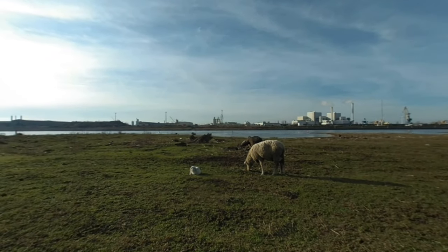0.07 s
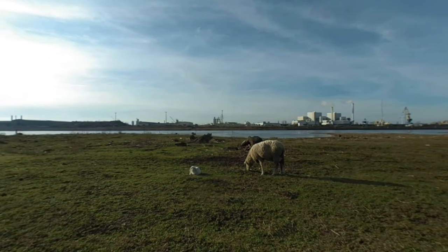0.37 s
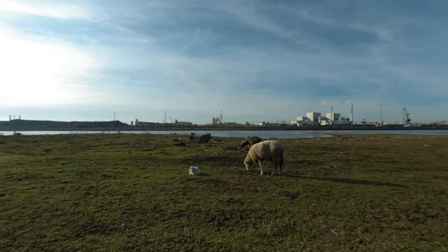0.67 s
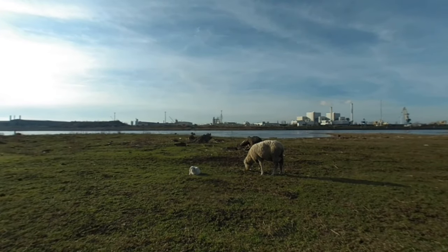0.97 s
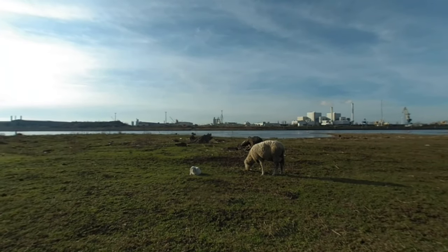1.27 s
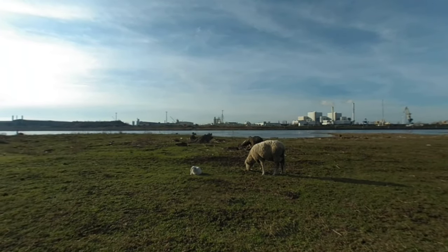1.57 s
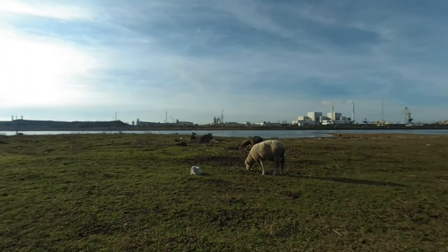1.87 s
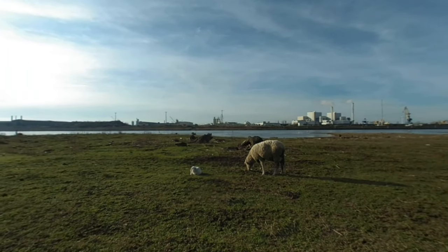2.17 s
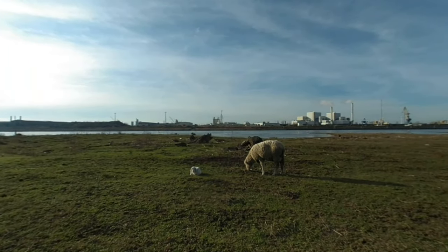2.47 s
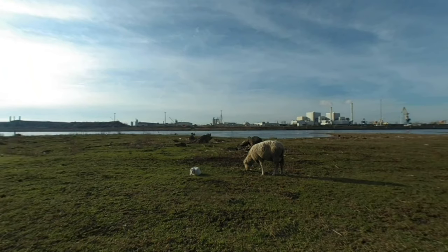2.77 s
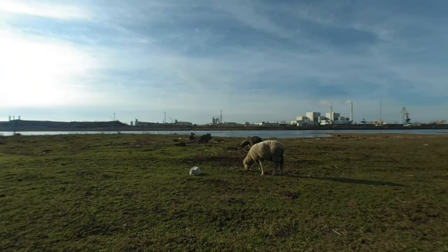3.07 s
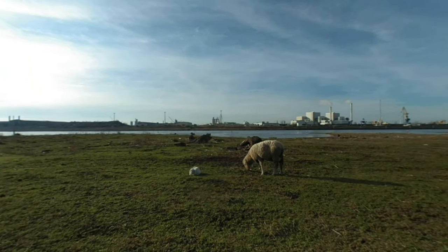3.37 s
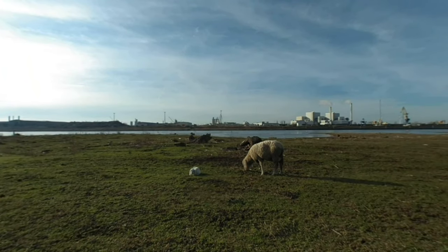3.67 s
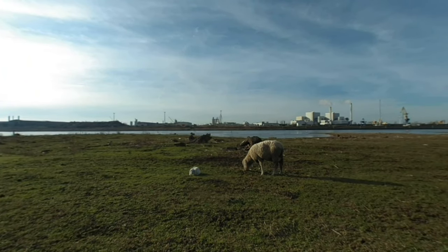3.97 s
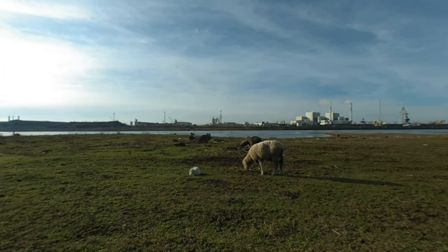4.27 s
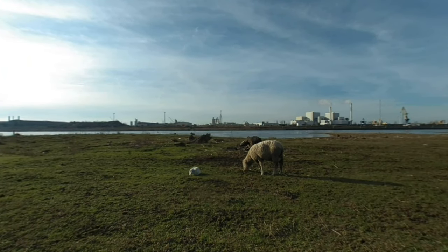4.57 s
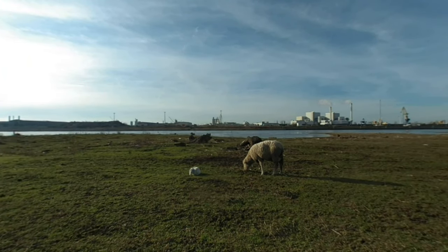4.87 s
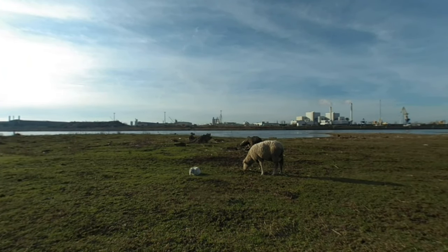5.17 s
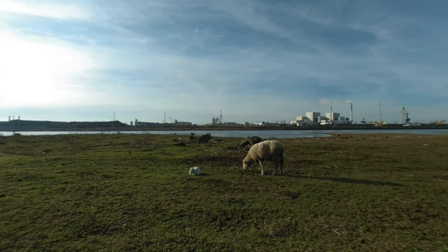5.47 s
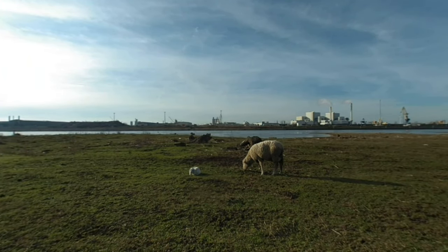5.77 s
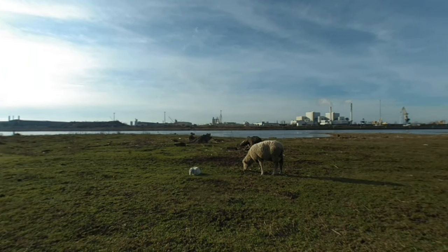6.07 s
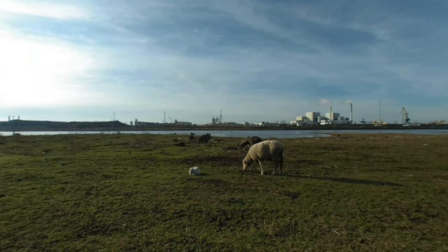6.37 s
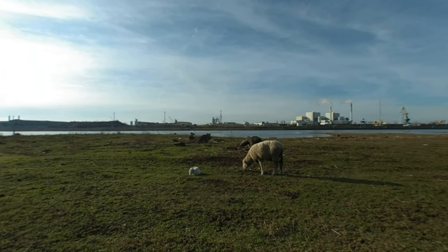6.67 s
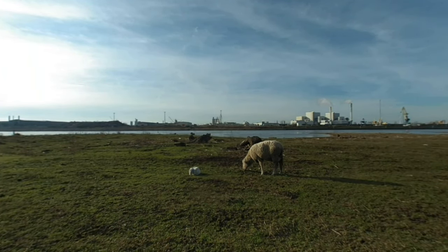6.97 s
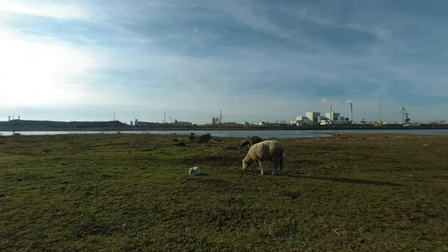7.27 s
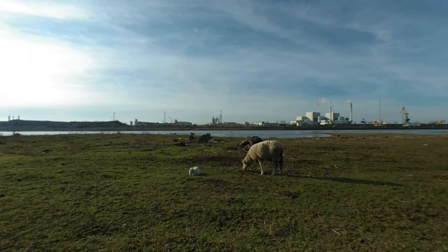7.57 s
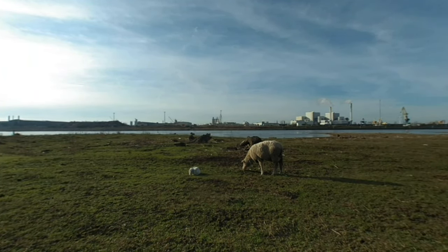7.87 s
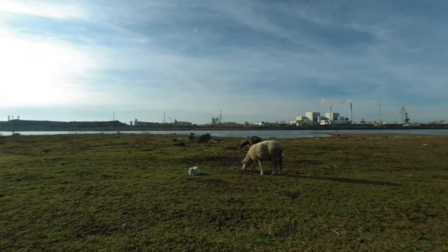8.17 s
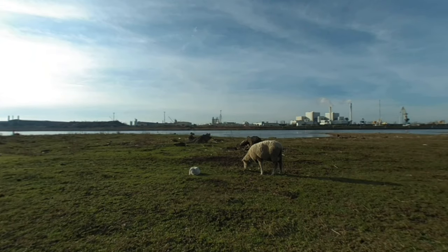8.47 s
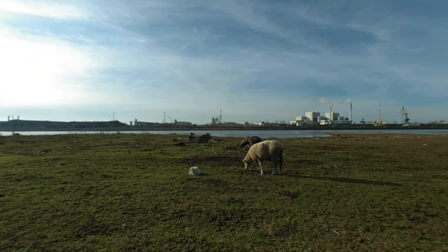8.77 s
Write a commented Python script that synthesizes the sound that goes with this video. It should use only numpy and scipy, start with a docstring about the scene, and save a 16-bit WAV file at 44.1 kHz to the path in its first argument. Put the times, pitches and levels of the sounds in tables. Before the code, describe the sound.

A sheep snorts once and then bleats with a trembling voice in an open field beside water. Wind hits the microphone in low, uneven thumps from side to side, louder than the animal, before easing back to a rumble. A weaker snort follows, along with tiny grass rustles and snaps. Distant machinery drones throughout with brief soft moaning tones, and a barely audible second sheep calls at the end.

```python
"""On a quiet grassy riverbank a sheep snorts, then gives one quavering bleat.
The snorts are air noise ringing the nose; the bleat is vocal-fold pulses filtered by mouth and throat.
Wind rumbles and buffets the two microphone ports over the drone of works across the water.
Far machinery moans now and then, dry grass rustles and snaps, the sheep snorts again,
and a distant sheep answers faintly."""
import sys
import numpy as np
from scipy import signal
from scipy.fft import rfft, irfft, next_fast_len
from scipy.io import wavfile
from scipy.ndimage import uniform_filter1d

SR = 44100
rng = np.random.default_rng(int(sys.argv[2]) if len(sys.argv) > 2 else 0)


def output_pcm(signal):
    """Save a mono or channel-first signal as 16-bit PCM at the path in sys.argv[1].

    Samples are clipped to [-1, 1] before scaling.
    """
    pcm = np.clip(np.atleast_2d(signal).T, -1, 1) * 32767
    wavfile.write(sys.argv[1], SR, np.round(pcm).astype(np.int16))


N = 388521
TIME = np.arange(N) / SR
CUTOFF_HZ = 15700


def amp(db):
    """Decibels to amplitude ratio."""
    return 10 ** (np.asarray(db) / 20)


def unit(x):
    """Normalisation to rms 1."""
    return x / np.sqrt(np.mean(x ** 2) + 1e-20)


def glide(rows, t):
    """Linear interpolation of each column of a table at the times t."""
    s, *columns = np.transpose(rows)
    return [np.interp(t, s, c) for c in columns]


def add(mix, s, sound):
    """Superposition of a sound on the mix, starting at time s."""
    part = mix[..., max(round(s * SR), 0):][..., :sound.shape[-1]]
    part += sound[..., :part.shape[-1]]


def noise(colour, size=N):
    """Gaussian noise of rms 1, shaped by a spectrum of (frequency [Hz], level [dB])."""
    hz, db = np.transpose(colour)
    span = next_fast_len(max(size, 4096))
    gain = amp(np.interp(np.log(np.fft.rfftfreq(span, 1 / SR) + 1), np.log(hz), db))
    return unit(irfft(rfft(rng.standard_normal(span)) * gain, span)[:size])


def wander(rate_hz, size=N):
    """Random modulation: low-pass noise of rms near 1."""
    span = next_fast_len(size + SR)
    gain = np.exp(-(np.fft.rfftfreq(span, 1 / SR) / rate_hz) ** 2)
    return unit(irfft(rfft(rng.standard_normal(span)) * gain, span))[:size]


def swell(length):
    """Hann envelope, length seconds wide at half height."""
    return np.hanning(max(round(2 * length * SR), 8))


def resonate(x, hz, width):
    """Damped resonator of gain 1 whose natural frequency may move."""
    turn = np.exp(2j * np.pi * np.cumsum(hz * np.ones(len(x))) / SR)
    r = np.exp(-np.pi * width / SR)
    return 2 * (turn * signal.lfilter([1 - r], [1, -r], x / turn)).real


def band(x, low_hz, high_hz, order=2):
    """Band-pass filter."""
    edges = [low_hz, np.clip(high_hz, low_hz + 50, CUTOFF_HZ)]
    return signal.sosfilt(signal.butter(order, edges, "band", fs=SR, output="sos"), x)


def tint(x, colour):
    """Minimum-phase filter of (frequency [Hz], gain [dB]): a pulse starts sharply and rings out."""
    log_gain = np.log(amp(np.interp(abs(np.fft.fftfreq(2048, 1 / SR)), *np.transpose(colour))))
    response = np.fft.ifft(np.exp(signal.hilbert(log_gain).conj())).real
    return signal.fftconvolve(x, response)[:len(x)]


def still_air(level_db=-76.5):
    """Ambient noise floor, uncorrelated between the ports."""
    # spectrum of still air: (frequency [Hz], level [dB])
    air_colour = [(100, 4.5), (500, 11.5), (1000, 2), (2000, -1.5), (5000, -3.5), (9000, -4), (10500, -8),
                  (15500, -7)]
    return amp(level_db) * np.array([noise(air_colour), noise(air_colour)])


def drone(hz=88.9, waver=0.38, overtone_db=-16.5):
    """Random amplitude and phase modulation makes the hum of the works and its octave waver."""
    phase = 2 * np.pi * hz * TIME
    hum = unit((1 + waver * wander(32)) * np.sin(phase) + waver * wander(31) * np.cos(phase))
    octave = wander(1.6) * np.sin(2 * phase) + wander(1.7) * np.cos(2 * phase)
    return hum + amp(overtone_db) * octave


def rumble(wind_db=2, drone_db=-1, gust_db=1.5, fading_db=1.2, apart=.9):
    """Turbulent wind pressure, partly coherent between the ports, adds to the drone of the works."""
    # spectrum of the wind: (frequency [Hz], level [dB])
    wind_colour = [(10, -30), (30, -39), (48, -22), (70, -4.5), (100, 2), (140, -1.5), (185, 3.5),
                   (235, -2.5), (285, -13.5), (315, -24.5), (350, -39), (450, -45.5), (700, -56),
                   (2000, -84)]
    # strength of the wind and of the drone: (time [s], level [dB])
    wind_levels = [(0, -43), (1.9, -43.5), (3.3, -43.5), (4.7, -44.5), (5.6, -42.5), (6.5, -48),
                   (7.5, -44.5), (8.81, -46)]
    drone_levels = [(0, -47.5), (.6, -45), (1.1, -45.5), (1.65, -44), (2.3, -45.5), (3.4, -43), (4.2, -37),
                    (4.55, -54.5), (5.05, -45.5), (5.5, -38.5), (6.2, -44.5), (6.75, -36.5), (7.25, -46),
                    (7.8, -38.5), (8.3, -39.5), (8.81, -37.5)]
    # the whole low rumble cuts out briefly: (start [s], end [s], gain [dB])
    dropouts = [(4.459, 4.518, -23), (4.635, 4.652, -24), (4.65, 4.815, -2), (4.793, 4.878, -22),
                (4.873, 4.95, -6.5)]
    shared = noise(wind_colour)
    wind = np.array([unit(shared + apart * noise(wind_colour)) for _ in range(2)])
    wind *= amp(wind_db + glide(wind_levels, TIME)[0] + gust_db * wander(31))
    drone_gain = amp(drone_db + glide(drone_levels, TIME)[0] + fading_db * wander(4.5))
    works = drone_gain * np.array([drone(), drone()])
    dropout_db = sum(db * ((TIME >= start) & (TIME < end)) for start, end, db in dropouts)
    return (wind + works) * amp(uniform_filter1d(dropout_db, size=500))


def moans(edge_s=0.044, waver=.8):
    """Tones of far machinery carry over the water, each spread into a narrow band by modulation."""
    # machine tones: (midpoint [s], duration [s], level [dB], frequency [Hz])
    tones = [(0.42, 0.062, -68.5, 393), (0.705, 0.057, -54.5, 379), (2.51, 0.047, -74, 547),
             (4.33, 0.185, -55, 514.6), (5.387, 0.053, -70, 683), (6.166, 0.18, -59, 506),
             (7.055, 0.067, -58.5, 505), (7.708, 0.051, -67.5, 692), (7.966, 0.17, -55, 505),
             (8.139, 0.083, -66.5, 671), (8.518, 0.54, -69, 696)]
    out = np.zeros(N)
    for s, length, db, hz in tones:
        t = np.arange(0, length + edge_s, 1 / SR)
        phase = 2 * np.pi * hz * t
        tone = (1 + waver * wander(58, len(t))) * np.sin(phase)
        tone += waver * wander(30, len(t)) * np.cos(phase)
        fade = signal.windows.tukey(len(t), min(2 * edge_s / t[-1], 1))
        add(out, s - t[-1] / 2, amp(db) * unit(tone) * fade)
    return out


def far_bleat(echo_db=-7, t60=0.42, jitter=.02, rasp=.3, flutter_db=3, width_hz=620):
    """Of a hoarse distant call only the main formant carries, blurred by the landscape's reverberation."""
    # the far sheep's call: (time [s], pitch [Hz], level [dB], formant [Hz])
    call = [(8.19, 380, -78, 1690), (8.24, 396.5, -82, 1910), (8.33, 372, -77, 1770),
            (8.41, 381, -75.5, 1800), (8.5, 355, -79.5, 1850), (8.585, 297, -76, 1500),
            (8.62, 313, -83, 1600), (8.655, 328, -76, 1900), (8.71, 322, -94, 1820)]
    t = np.arange(call[0][0], call[-1][0], 1 / SR)
    size = len(t)
    hz, db, mouth_hz = glide(call, t)
    turns = np.cumsum(hz * (1 + jitter * wander(130, size))) / SR
    folds = unit(sum(np.cos(2 * np.pi * k * turns) for k in range(3, 8)))
    folds += rasp * unit(band(rng.standard_normal(size), 1600, 2300))
    voice = unit(resonate(resonate(folds, mouth_hz, width_hz), mouth_hz, width_hz))
    out = np.zeros(N)
    add(out, t[0], voice * amp(db + flutter_db * wander(40, size)) * signal.windows.tukey(size, .1))
    age = np.arange(SR // 2) / SR
    tail = unit(rng.standard_normal(len(age)) * amp(-60 * age / t60)) / np.sqrt(len(age))
    return (out + amp(echo_db) * signal.fftconvolve(out, tail)[:N]) / np.sqrt(2)


def crackles(crackle_db=4):
    """Independently modulated treble bands: grass rustling, and a fizz on the hardest wind thump."""
    # bursts of high crackle: (midpoint [s], duration [s], level [dB])
    bursts = [(3.113, 0.088, -70.5), (3.876, 0.092, -72), (4.9, 0.054, -72), (4.943, 0.14, -80),
              (5.08, 0.045, -72), (5.132, .08, -84), (5.377, 0.085, -81), (5.502, 0.038, -75.5),
              (5.688, 0.099, -69.5), (5.849, 0.13, -76.5), (6.014, 0.11, -76.5), (6.183, .09, -79),
              (6.34, 0.18, -86), (6.838, 0.097, -77), (7.005, 0.098, -73), (7.063, 0.047, -69),
              (7.13, 0.073, -80), (7.501, 0.07, -75.5), (7.657, 0.083, -73.5), (7.976, 0.055, -80),
              (8.707, 0.1, -74)]
    # spectrum of the crackle: (frequency [Hz], level [dB])
    colour = [(3000, -49), (5500, -14), (7000, -5.5), (8500, 0.5), (11000, 0.5), (13000, 2), (15500, -6)]
    edges_hz = [3000, 7500, 9000, 10500, 12000, 13500, 15500]
    out = np.zeros((2, N))
    for s, length, db in bursts:
        shape = swell(length)
        size = len(shape)
        for port in out:
            crackle = sum(band(noise(colour, size), low, high) * amp(crackle_db * wander(200, size))
                          for low, high in zip(edges_hz, edges_hz[1:]))
            add(port, s - length, amp(db) * shape * unit(crackle))
    return out


def snaps(rise_s=0.00065, decay_s=0.0047, apart=.5):
    """Brittle fracture of a grass blade gives a bright transient that decays exponentially."""
    # breaking blades: (time [s], level [dB], centre frequency [Hz])
    fractures = [(3.076, -45, 13000), (5.062, -62, 10590), (5.678, -60, 12000), (5.692, -58.5, 8950),
                 (5.986, -63.5, 9700), (7.057, -57, 12500), (7.621, -64.5, 9000), (8.702, -61, 10900),
                 (8.716, -67, 12500)]
    t = np.arange(0, 8 * decay_s, 1 / SR)
    shape = (1 - np.exp(-t / rise_s)) * np.exp(-t / decay_s)
    out = np.zeros((2, N))
    for s, db, hz in fractures:
        colour = [(hz / 4, -50), (.6 * hz, -18), (.85 * hz, 0), (1.15 * hz, 0), (2 * hz, -15)]
        shared = noise(colour, len(t))
        for port in out:
            add(port, s, amp(db) * shape * unit(shared + apart * noise(colour, len(t))))
    return out


def short_noises(level_db=-3):
    """Band-limited noise: faint ticks, a whistle before the snort, a lip smack, a wash after the gust."""
    # short noises: (midpoint [s], duration [s], relative level [dB], low edge [Hz], high edge [Hz])
    bursts = [(1.297, 0.021, -72, 1280, 1370), (1.917, 0.0035, -59.5, 756, 1880),
              (1.943, 0.065, -78, 845, 1510), (2.055, 0.015, -80.5, 2100, 2480),
              (2.295, 0.006, -73, 1300, 1580), (2.364, 0.087, -78, 880, 1100),
              (2.415, 0.0045, -71.5, 2130, 5040), (2.501, 0.016, -71, 1400, 2270),
              (2.528, 0.016, -72.5, 1380, 2320), (2.668, 0.014, -58, 610, 1070),
              (3.949, 0.096, -58.5, 332.7, 570), (3.895, .025, -57, 599, 1100),
              (7.831, 0.021, -75.5, 950, 1440), (7.989, 0.0078, -70.5, 1550, 2020),
              (8.103, 0.024, -75.5, 900, 990)]
    out = np.zeros(N)
    for s, length, db, low_hz, high_hz in bursts:
        shape = swell(length)
        colour = [(low_hz / 2, -40), (low_hz, 0), (high_hz, 0), (1.4 * high_hz, -35), (8 * high_hz, -70)]
        add(out, s - length, amp(db + level_db) * unit(shape * noise(colour, len(shape))))
    return out


def eddies(start_s=3.1, end_s=4.35, count=11, rise_s=.014, db=-31, hz=124.4, right_share=.55):
    """Turbulence: one weak eddy at random in each equal part of the gust, as rows for buffets()."""
    times = start_s + (end_s - start_s) * (np.arange(count) + rng.random(count)) / count
    return [(s, rise_s, db + 1.5 * rng.standard_normal(), hz * 2 ** (0.41 * rng.uniform(-0.68, 1)),
             rng.random() < right_share) for s in times]


def buffets(leak_db=-24, reach=1.885, harden=.35, hard_db=-16, sag=0.088, swirl=0.2, churn=0.59):
    """An eddy's pressure pulse thumps one port and sags in pitch; the hardest have a wider bandwidth."""
    # strong eddies: (peak time [s], rise [s], level [dB], frequency [Hz], port [0 left, 1 right])
    strong_eddies = [(2.855, 0.0049, -19.5, 150, 1), (2.876, 0.008, -33, 130, 1),
                     (2.992, .016, -26, 105, 1), (3.2, 0.0072, -19.5, 185, 1), (3.239, 0.0055, -18, 140, 1),
                     (3.346, .005, -13, 150, 1), (3.389, .006, -14, 157, 0), (3.412, 0.0079, -18, 115, 0),
                     (3.498, .009, -17.5, 88, 1), (3.581, 0.0087, -19, 150, 0),
                     (3.603, 0.013, -18.5, 125, 0), (3.655, 0.004, -20, 165, 0),
                     (3.799, 0.0096, -19, 150, 1), (3.827, 0.0065, -14.5, 145, 1),
                     (3.846, .009, -10, 156.7, 1), (3.885, 0.0088, -10.5, 200, 1),
                     (3.903, .005, -12.5, 150, 1), (4.099, .017, -21.5, 90, 1),
                     (4.156, 0.0061, -14, 176, 0), (4.176, 0.0074, -20.5, 170, 0),
                     (4.233, 0.013, -20.5, 100, 0), (4.684, 0.0052, -24.5, 191, 1),
                     (5.082, .03, -30.5, 117, 0), (7.525, .025, -23, 94, 0), (7.605, 0.027, -27, 129, 0)]
    out = np.zeros((2, N))
    for s, rise, db, hz, port in strong_eddies + eddies():
        age = np.arange(0, 10 * rise, 1 / SR) / rise  # in rise times
        pitch = hz * np.exp(sag * (1 - age) + swirl * wander(110, len(age)))
        turns = rng.random() + np.cumsum(pitch) / SR
        colour = [(0.26 * hz, -25), (0.51 * hz, 0), (1.42 * hz, 0), (7 * hz, -28), (15000, -80)]
        pressure = unit(np.sin(2 * np.pi * turns) + churn * noise(colour, len(age)))
        envelope = (age * np.exp(1 - age)) ** 2
        top_hz = reach * hz * amp(harden * max(db - hard_db, 0))
        thump = amp(db) * band(pressure * envelope, 50, top_hz, order=5) * np.minimum(age[-1] - age, 1)
        side = int(port)
        add(out[side], s - rise, thump)
        add(out[1 - side], s - rise, thump * amp(leak_db))
    return out


def snorts(level_db=-1, flutter=0.065, dulling=0.52):
    """Turbulent blasts of air excite the nasal resonances; the weaker the blast, the duller it is."""
    # one envelope per snort: (time [s], relative level [dB])
    blasts = [
        [(1.295, -72), (1.316, -49.5), (1.335, -43), (1.35, -40.5), (1.382, -40), (1.393, -55), (1.42, -67),
         (1.52, -97)],
        [(4.272, -85), (4.31, -58), (4.354, -51), (4.464, -71.5), (4.48, -92)],
    ]
    # resonances of the nose: (frequency [Hz], bandwidth [Hz], gain [dB])
    nose_modes = [(459, 100, 6), (615, 290, -2.5), (940, 540, -11.5), (1323, 220, -6.5), (1585, 230, -9.5),
                  (2040, 190, -21.5), (3430, 380, -21), (4140, 1060, -27), (5200, 330, -31),
                  (6150, 300, -36), (10600, 3000, -36)]
    out = np.zeros(N)
    for rows in blasts:
        s, db = np.transpose(rows)
        t = np.arange(s[0], s[-1], 1 / SR)
        blast_db = np.interp(t, s, db)
        air = 0
        for hz, width, mode_db in nose_modes:
            ring = rng.standard_normal(len(t))
            for _ in range(3):  # three passes narrow each peak and keep the valleys dark
                ring = resonate(ring, hz, width)
            air = air + ring * amp(mode_db + dulling * (blast_db - db.max()) * np.log2(hz / 1000))
        air = air / np.std(air[blast_db > db.max() - 10]) * (1 + flutter * wander(150, len(t)))
        add(out, s[0], air * amp(level_db + blast_db) * signal.windows.tukey(len(t), .1))
    return out


def quaver(t, fall_s=.017, recover_s=.027):
    """Modulation by about twelve dips a second: their depth, pitch drop, effort drop and roughness."""
    # dips of the voice: (time [s], pitch drop [Hz], effort drop [dB], roughness [0-1])
    dips = [(2.734, 26.5, 23, .5), (2.814, 44, 13, 0), (2.904, 36, 9, 0.04), (2.995, 22, 8.5, 0),
            (3.08, 20, 8, 0.1), (3.165, 15, 5.5, .12), (3.25, 15, 4, 0.1), (3.338, 10.1, 4.5, 0.3)]
    dips = np.array(dips)
    since = t[:, None] - dips[:, 0]
    depth = np.exp(-(since / np.where(since < 0, fall_s, recover_s)) ** 2)
    return (depth.sum(1), *(depth @ dips[:, 1:]).T)


def vocal_folds(hz, rough, jitter=.02, shimmer=.7, uneven_db=1.3):
    """Glottal source: phase in cycles, pulses with jitter and shimmer, and a puff at each opening."""
    size = len(hz)
    turns = np.cumsum(hz * (1 + jitter * rough * wander(220, size) + .004 * wander(55, size))) / SR
    harmonics = range(1, int(CUTOFF_HZ / hz.max()) + 2)
    pulses = unit(sum(np.cos(2 * np.pi * k * turns) * amp(uneven_db * wander(22, size))
                      for k in harmonics))
    pulses *= 1 + shimmer * rough * wander(100, size)
    opening = unit(0.52 + np.exp(-(turns % 1) / 0.53))
    return turns, pulses, opening * rng.standard_normal(size)


def sizzle(x, t, lift_db, edge_hz=8300, peak_s=3.063, spread_s=0.17, ends_db=-4.5, rise_db=10):
    """A varying high shelf: the top of the voice sizzles most in the middle of the cry."""
    top = signal.sosfiltfilt(signal.butter(6, edge_hz, "high", fs=SR, output="sos"), x)
    shelf_db = ends_db + rise_db * np.exp(-((t - peak_s) / spread_s) ** 2)
    return x - top + top * amp(shelf_db + lift_db)


def bleat(level_db=-1, hum_follow=1.7, unsteady_db=0.1, low_rasp=.45, high_rasp=.65, hiss=.14):
    """Source and filter: fold pulses and breath excite the formants of the mouth and throat."""
    # the cry along the crests of its quaver: (time [s], pitch [Hz], effort [dB], brightness [dB])
    cry = [(2.655, 357, -80, -30), (2.685, 331.2, -52, -10.5), (2.708, 318, -52, -8),
           (2.772, 357.3, -52.5, 1), (2.86, 351.5, -48, 4.5), (2.96, 352.7, -46.5, 5.5),
           (3.045, 353.9, -44, 1.5), (3.205, 347, -44, -1), (3.29, 346.6, -45, -2.5),
           (3.37, 317.4, -48, -8.5), (3.388, 290, -63, -19)]
    # jaw and tongue: (time [s], mouth tuning [ratio], throat tuning [ratio], upper formant gain [dB])
    articulation = [(2.655, 0.59, 0.97, -24), (2.7, 0.84, 0.95, -28), (2.78, 1.04, 0.96, -1),
                    (2.95, 1.045, 0.93, 11), (3.2, 0.975, 0.96, -1.5), (3.39, .98, 1.045, -1)]
    # resonances of the mouth: (frequency [Hz], bandwidth [Hz], gain [dB])
    formants = [(986, 190, 16), (1280, 140, -15), (1780, 160, 3.5), (2020, 170, -5)]
    # main resonance of the throat: (frequency [Hz], bandwidth [Hz])
    throat_mode = (4140, 475)
    # colour that the head gives to the treble: (frequency [Hz], gain [dB])
    head_colour = [(1200, -40), (2000, -12), (2430, -4), (2780, -6), (3130, -3), (3480, 3), (4170, -2.5),
                   (4750, -5), (5270, 5), (5900, -2), (6650, -4), (7400, 8), (8000, -9), (9500, -5),
                   (10300, 4), (11200, -8), (14300, -4), (15500, -9)]
    rough_start, rough_settled, settle_s = .7, .14, .11
    t = np.arange(cry[0][0], cry[-1][0], 1 / SR)
    hz, effort_db, bright_db = glide(cry, t)
    mouth, throat, open_db = glide(articulation, t)
    dip, drop_hz, drop_db, dip_rough = quaver(t)
    effort_db -= drop_db
    # in a dip the throat tightens: its resonance rises and the treble drops less
    throat *= 1 + 0.034 * dip
    lift_db = 0.42 * drop_db
    onset_rough = (rough_start - rough_settled) * np.exp((t[0] - t) / settle_s)
    rough = np.minimum(rough_settled + onset_rough + dip_rough, 1)
    turns, pulses, puffs = vocal_folds(hz - drop_hz, rough)
    soft = pulses + low_rasp * rough * puffs
    low = sum(amp(db + open_db * (k > 0)) * resonate(soft, f * mouth, width)
              for k, (f, width, db) in enumerate(formants))
    airy = (pulses + (hiss + high_rasp * rough) * puffs) / np.hypot(1, high_rasp * rough)
    high = unit(resonate(tint(airy, head_colour), throat_mode[0] * throat, throat_mode[1]))
    high = amp(bright_db + lift_db) * sizzle(high, t, lift_db)
    # the low hum of the bleat swells with its loudness
    hum = np.sin(2 * np.pi * turns) * amp(hum_follow * (effort_db - effort_db.max()))
    voice = unit(band(low, 430, 1700)) + high + hum
    gain = amp(level_db + effort_db + unsteady_db * wander(38, len(t)))
    out = np.zeros(N)
    add(out, t[0], voice * gain * signal.windows.tukey(len(t), .02))
    return out


def open_bank(x, lag_s=.00003, scatter_db=-25, t60=0.44):
    """Path difference favours the nearer left port; scattering from the bank adds a faint dull tail."""
    t = np.arange(SR // 2) / SR
    decay = amp(-60 * t / t60)
    delayed = irfft(rfft(x) * np.exp(-2j * np.pi * np.fft.rfftfreq(N, 1 / SR) * lag_s), N)
    out = np.array([amp(-0.5) * x, amp(-1.0) * delayed])
    for port in out:
        tail = unit(band(rng.standard_normal(len(t)), 400, 3000, order=1) * decay) / np.sqrt(len(t))
        port += amp(scatter_db) * signal.fftconvolve(x, tail)[:N]
    return out


def scene():
    """Superposition of the two sheep, the wind, the far works and the small sounds of the bank."""
    air = still_air()
    near = open_bank(bleat() + snorts() + short_noises())
    return near + far_bleat() + rumble() + buffets() + moans() + crackles() + snaps() + air


def record(dry, low_cut_hz=53):
    """Band limiting by the recorder: a high-pass wind filter and a steep low-pass."""
    cut = signal.sosfilt(signal.butter(5, low_cut_hz, "high", fs=SR, output="sos"), dry)
    taps = signal.firwin(511, CUTOFF_HZ, window=("kaiser", 9), fs=SR)
    return signal.oaconvolve(cut, taps[None], "same", axes=1)


dry = scene()
out = record(dry)
output_pcm(out)
```